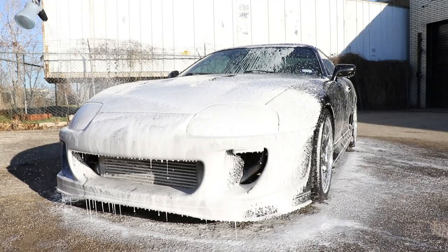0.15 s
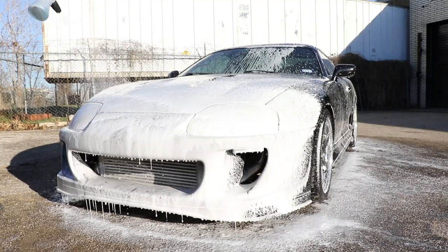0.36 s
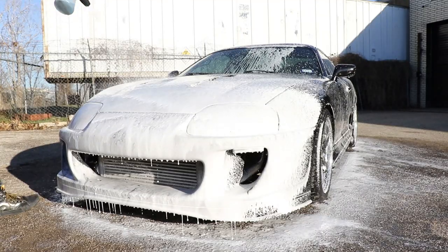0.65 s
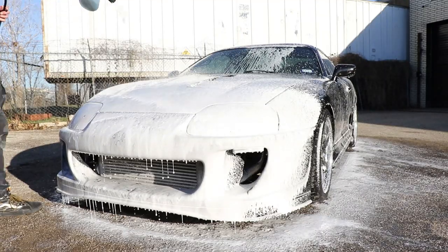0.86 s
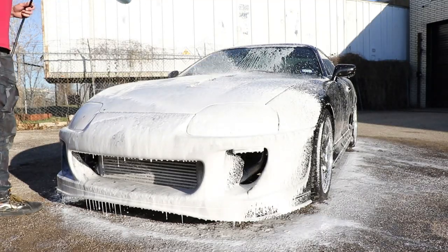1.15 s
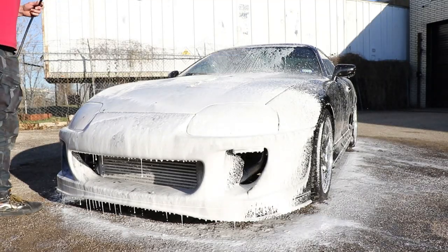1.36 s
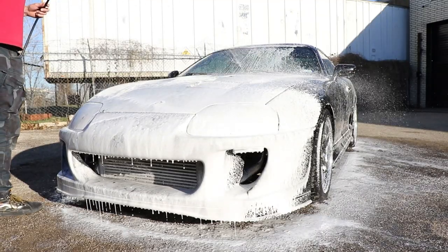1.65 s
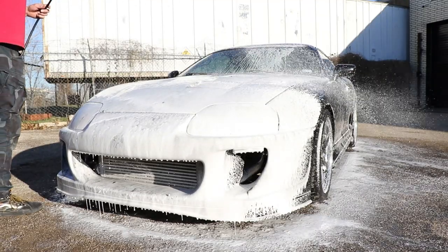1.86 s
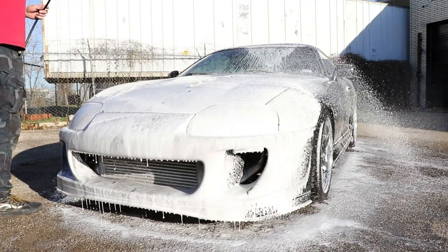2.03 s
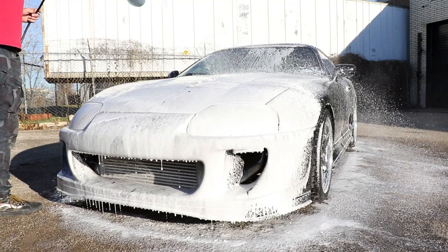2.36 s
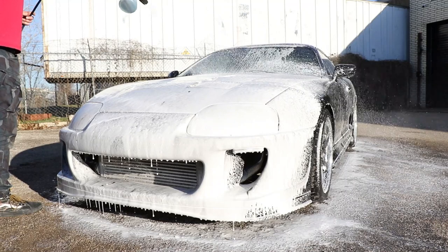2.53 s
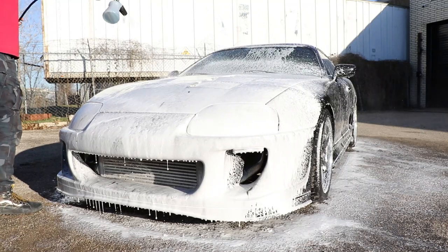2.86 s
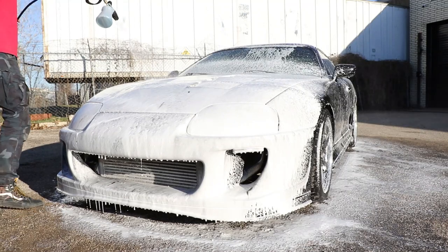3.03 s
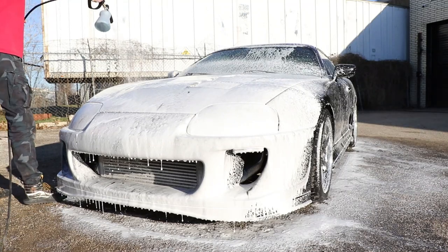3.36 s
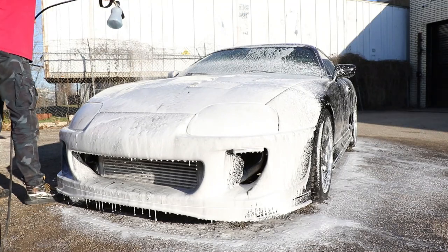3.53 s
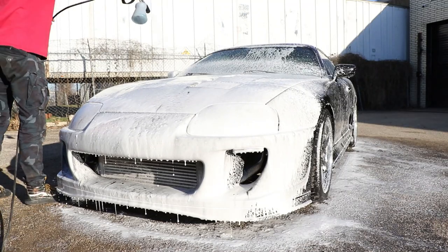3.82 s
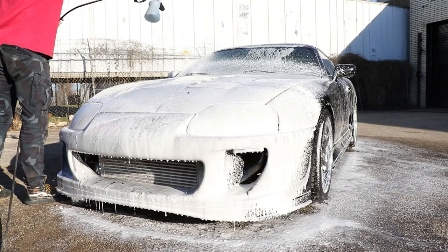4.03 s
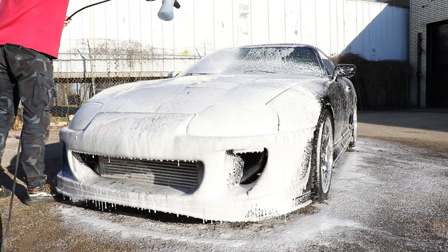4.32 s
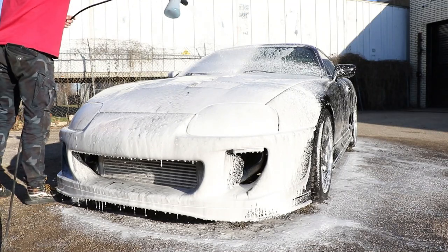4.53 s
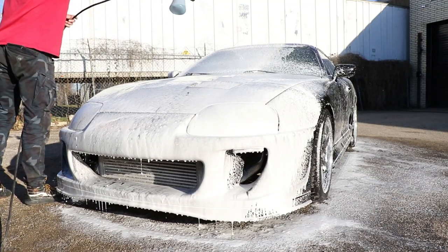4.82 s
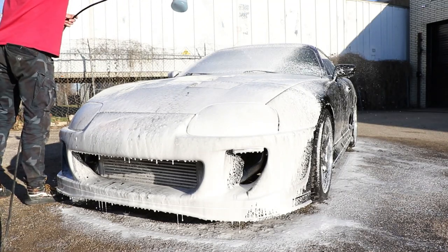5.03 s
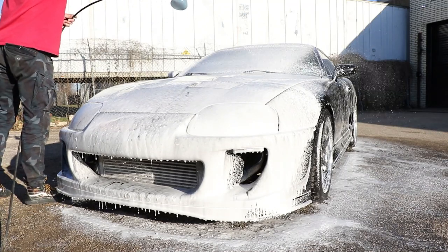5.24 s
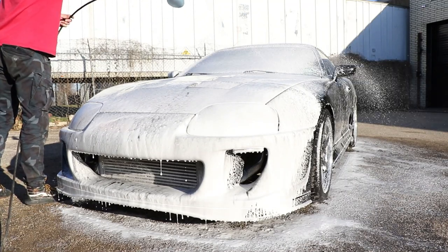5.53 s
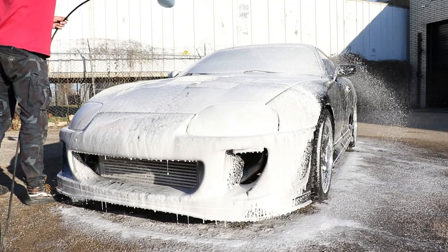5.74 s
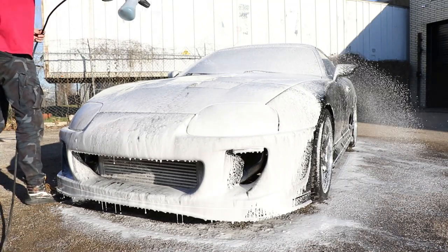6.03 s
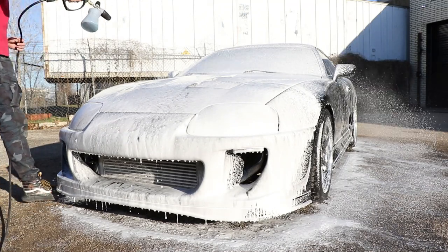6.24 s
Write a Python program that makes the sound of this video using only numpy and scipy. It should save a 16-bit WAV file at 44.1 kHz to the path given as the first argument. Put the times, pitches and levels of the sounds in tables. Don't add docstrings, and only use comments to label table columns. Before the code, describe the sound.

A pressure washer's foam lance hisses broadly and continuously over a car, its tone sliding as it sweeps, with bright spatter and a steady motor whine behind.

```python
import sys
import numpy as np
from scipy import signal
from scipy.fft import rfft, irfft
from scipy.io import wavfile
from scipy.ndimage import uniform_filter1d, map_coordinates

SR = 44100
rng = np.random.default_rng(int(sys.argv[2]) if len(sys.argv) > 2 else 0)


def convert_level_to_amplitude(level_db):
    exponent = np.asarray(level_db, float) / 20
    return 10 ** exponent


def persist_wave(psi):
    counts = np.round(np.clip(psi, -1, 1) * 32767).astype(np.int16)
    wavfile.write(sys.argv[1], SR, np.atleast_2d(counts).T)


N = 281799


def rms_one(x):
    return x / np.sqrt(np.mean(x ** 2) + 1e-20)


def in_time(rows):
    s, *columns = np.transpose(rows)
    return [np.interp(np.arange(N) / SR, s, c) for c in columns]


def swells(rows, edge_s):
    t = np.arange(N) / SR
    shapes = []
    for start_s, length_s, height in rows:
        attack = (t - start_s) / edge_s + 0.5
        release = (start_s + length_s - t) / edge_s + 1
        shapes.append(height * np.clip(np.minimum(attack, release), 0, 1))
    return np.max(shapes, axis=0)


def drift(rate_hz):
    step = 40
    r = np.exp(-2 * np.pi * step * rate_hz / SR)
    slow = signal.lfilter([1], [1, -2 * r, r * r], rng.standard_normal(N // step + 2002))[2000:]
    return np.interp(np.arange(N) / step, np.arange(len(slow)), rms_one(slow))


def coloured(x, spectrum):
    hz, db = np.transpose(spectrum)
    grid_hz = np.maximum(np.fft.rfftfreq(N, 1 / SR), 1)
    gain = convert_level_to_amplitude(np.interp(np.log(grid_hz), np.log(hz), db))
    return rms_one(irfft(rfft(x) * gain, N))


def turbulence(modes, flicker_db, shared_db):
    surge, out = drift(28.0), 0
    for hz, width_hz, level_db in modes:
        r = np.exp(-np.pi * width_hz / SR)
        poles = [1, -2 * r * np.cos(2 * np.pi * hz / SR), r * r]
        band = rng.standard_normal(N)
        for _ in range(2):
            band = signal.lfilter([1, 0, -1], poles, band)
        out = out + rms_one(band) * convert_level_to_amplitude(level_db + flicker_db * drift(9.1) + shared_db * surge)
    return rms_one(out)


# start_s, ground_delay_ms, body_delay_ms
ECHO_DELAYS = [(0.0, 1.89, 0.92), (0.17, 1.905, 0.94), (0.75, 2.14, 1.115), (1.1, 2.3, 1.15),
               (1.66, 2.46, 1.245), (1.85, 2.51, 1.325), (2.0, 2.53, 1.31), (2.11, 2.472, 1.233),
               (2.57, 2.13, 0.785), (3.02, 1.915, 0.55), (3.34, 1.815, 0.455), (3.47, 1.862, 0.44),
               (3.7, 1.94, 0.495), (4.3, 2.04, 0.565), (5.28, 2.22, 0.75), (5.65, 2.295, 0.865),
               (5.89, 2.25, 0.845), (6.39, 1.875, 0.615)]


def echo_delays_ms():
    return in_time(ECHO_DELAYS)


# pitch_hz, width_hz, level_db
LANCE_MODES = [(2700, 2700, -8), (3655, 800, 3.5), (4190, 740, -2.5), (4780, 590, -3), (5374, 680, -0.5),
               (6217, 920, -0.5), (7360, 830, -10.5), (9050, 610, -17), (10400, 1500, -21.5),
               (12500, 2700, -25)]
# start_s, length_s, loss_db
TURN_AWAY = [
    (2.9, 0.89, 2),
    (6.37, .3, 2.5),
]
TURN_S = 0.36


def jet(reach_ms):
    level_db = -21.05 - 0.5 * reach_ms - swells(TURN_AWAY, TURN_S)
    return convert_level_to_amplitude(level_db) * turbulence(LANCE_MODES, flicker_db=1.0, shared_db=0.85)


OPEN_S = 0.071
# pitch_hz, width_hz, level_db
NOZZLE_MODES = [(1832, 240, 6.5), (1977, 240, 5.5)]
# start_s, length_s, rise_db
NOZZLE_FACES = [
    (1.2, 0.22, 1.5),
    (2.2, 0.089, 2),
    (3.6, 0.31, 2),
    (4.06, 0.12, 2),
]


def nozzle_whistle(reach_ms):
    level_db = -26.5 + 3.5 * reach_ms + swells(NOZZLE_FACES, OPEN_S)
    return convert_level_to_amplitude(level_db) * turbulence(NOZZLE_MODES, flicker_db=1.0, shared_db=1.0)


# pitch_hz, width_hz, level_db
BARREL_MODES = [(934, 405, 0.5), (1237, 555, 3.5), (660, 520, -4)]
# start_s, length_s, rise_db
BARREL_OPENS = [
    (0, 0.023, 1.1),
    (2.6, .15, 2),
    (3.5, .25, 3.6),
    (5.2, 0.098, 1.1),
]


def barrel(reach_ms):
    level_db = -27.5 + 1.6 * reach_ms + swells(BARREL_OPENS, OPEN_S)
    return convert_level_to_amplitude(level_db) * turbulence(BARREL_MODES, flicker_db=1.0, shared_db=0.22)


# pitch_hz, width_hz, level_db
CHAMBER_MODES = [(479.7, 147, 2.5), (353, 160, -10.5)]


def chamber_roar(reach_ms):
    return convert_level_to_amplitude(-30.5 - 3 * reach_ms) * turbulence(CHAMBER_MODES, flicker_db=0.2, shared_db=0.4)


def lance():
    reach_ms = echo_delays_ms()[1] - 0.85
    return jet(reach_ms) + nozzle_whistle(reach_ms) + barrel(reach_ms) + chamber_roar(reach_ms)


def droplets(per_s, spectrum):
    sizes = convert_level_to_amplitude(5.3 * np.minimum(rng.exponential(1, N), 4.2)) * rng.choice([-1, 1], N)
    chance = per_s * convert_level_to_amplitude(2.5 * drift(25.0)) / SR
    bursts = sizes * (rng.random(N) < chance)
    mixed = 1.07 * rms_one(bursts) + rng.standard_normal(N)
    return convert_level_to_amplitude(0.87 * drift(30.0)) * coloured(mixed, spectrum)


# start_s, level_db
LANDING = [(0, -37), (.14, -47), (.43, -41.5), (.53, -33.5), (.98, -31.5), (1.42, -33.5), (1.71, -31.5),
           (1.96, -38), (2.68, -36), (2.99, -41), (3.16, -37), (3.35, -43.5), (3.84, -39), (4.09, -33.5),
           (4.43, -31), (4.66, -35), (5.6, -41), (6.39, -40.5)]
# pitch_hz, level_db per Hz
BLOB_SPECTRUM = [(5000, -37), (7500, 4.5), (8500, 4), (10500, 6), (12000, 0), (13500, -16), (16000, -40)]
# pitch_hz, level_db per Hz
MIST_SPECTRUM = [(10000, -37), (12000, 2.5), (13000, 0), (14500, -5), (15700, -9), (17000, -30)]


def spatter():
    level_db, = in_time(LANDING)
    blobs = convert_level_to_amplitude(level_db - 1.6) * droplets(8000, BLOB_SPECTRUM)
    mist_db = level_db - 11.5 - 1.5 * swells(TURN_AWAY[:1], TURN_S)
    return blobs + convert_level_to_amplitude(mist_db) * droplets(9000, MIST_SPECTRUM)


def late(x, delay_ms):
    return map_coordinates(x, [np.arange(N) - delay_ms * SR / 1000], order=2, mode="mirror")


def low_pass(x, cutoff_hz):
    return signal.sosfiltfilt(signal.butter(2, cutoff_hz, fs=SR, output="sos"), x)


# start_s, length_s, share (0-1), start_delay_ms, end_delay_ms
GLINTS = [
    (5.45, 0.44, 0.2, 1.48, 1.36),
    (5.62, 0.44, 0.12, 1.07, 0.96),
    (2.02, 0.35, 0.1, 1.23, 1.48),
    (2.45, 0.29, 0.02, 1.04, 0.81),
]


def glints(dull):
    t, out = np.arange(N) / SR, 0
    for start_s, length_s, share, *delays_ms in GLINTS:
        delay_ms = np.interp(t, [start_s, start_s + length_s], delays_ms)
        out = out + swells([(start_s, length_s, share)], edge_s=0.079) * late(dull, delay_ms)
    return out


def over_foam(dull):
    low = low_pass(dull, 2500)
    treble_share = np.interp(np.arange(N) / SR, [3.1, 3.1 + 0.46], [1, 0.51])
    return low + treble_share * (dull - low)


# start_s, ground_share (0-1), body_share (0-1)
FACING = [(0, 0.4, 0.44), (.8, 0.33, 0.13), (1.3, 0.38, 0.34), (1.6, 0.43, 0.18), (2.0, 0.56, 0.16),
          (2.3, 0.43, 0.09), (2.7, 0.46, 0.22), (3.45, 0.17, 0.12), (3.9, 0.27, 0.12), (4.5, 0.32, 0.16),
          (5.2, 0.44, 0.25), (5.65, 0.46, 0.02), (6.05, 0.52, .26), (6.39, 0.2, 0)]
SCATTER_RATIOS = .36, .78, 1.17


def with_echoes(direct):
    dull = low_pass(direct, 11100)
    ground_ms, body_ms = uniform_filter1d(echo_delays_ms(), size=SR // 12)
    falling = np.maximum(-np.gradient(ground_ms) * SR, 0)
    shares = [*in_time(FACING), 0.053 + 0.1 * falling]
    ground, body, between = np.clip(shares, 0, 0.95)
    heard = direct + glints(dull)
    heard += ground * late(over_foam(dull), ground_ms)
    heard += body * late(dull, body_ms)
    heard += between * late(dull, ground_ms - body_ms)
    for ratio in SCATTER_RATIOS:
        heard += 0.097 * drift(1.0) * late(dull, ratio * ground_ms)
    return heard / np.sqrt(1 + ground ** 2 + body ** 2 + between ** 2)


# start_s, pitch_hz, level_db
PUMP_WHINE = [(0, 573.2, -32), (.25, 573.4, -27.5), (.85, 573.4, -36.5), (1.2, 572, -29.5),
              (2.0, 571.5, -30), (2.9, 573, -29.5), (3.35, 571.5, -27.5), (3.7, 570.4, -22.5),
              (4.2, 570.6, -27.5), (4.8, 570.6, -31), (5.2, 570.6, -27.5), (5.9, 570, -27.5),
              (6.39, 571.7, -30)]
# start_s, level_db
MESH = [(0, -38), (1.2, -38), (1.8, -42), (2.3, -42), (3.0, -43), (3.41, -41), (3.47, -34), (3.57, -29),
        (3.69, -27), (3.74, -41), (3.95, -31), (4.2, -31), (4.45, -37.5), (5.1, -33.5), (6.39, -33)]
# start_s, length_s, rise_db
LOWER_SWELLS = [
    (0, 0.53, 7.4),
    (3.0, 0.32, 10.6),
    (3.55, .3, 9.7),
]
# start_s, length_s, loss_db
UPPER_HIDDEN = [
    (0, 2.4, 4.5),
]
SWELL_S = 0.4
MOTOR_ORDERS = 6, 7.96, 9.96
MESH_ORDERS = 33, 58
FAINT_ORDERS = 6.96, 9, 31.7, 42.95, 45.05
FAINT_DB = -46, -42.5, -47.5, -39.5, -66
WAVER = .25, 1.2, .6, .4, 1.5
# pitch_hz, width_hz, level_db
FAN_MODES = [(2630, 1260, -0.5), (3030, 430, -5.5), (688, 250, -5)]


def motor():
    whine_hz, whine_db = in_time(PUMP_WHINE)
    mesh_db, = in_time(MESH)
    lower_db = -47.5 + swells(LOWER_SWELLS, SWELL_S)
    upper_db = -37 - swells(UPPER_HIDDEN, SWELL_S) + 0.13 * (mesh_db - mesh_db.mean())
    shaft = 2 * np.pi * np.cumsum(whine_hz / MOTOR_ORDERS[0]) / SR
    out = convert_level_to_amplitude(-39.5) * turbulence(FAN_MODES, flicker_db=1.0, shared_db=-0.5)
    orders = [*MOTOR_ORDERS, *MESH_ORDERS]
    levels_db = [whine_db, lower_db, upper_db, mesh_db, mesh_db - 6]
    for order, level_db, waver_rad in zip(orders, levels_db, WAVER):
        out += convert_level_to_amplitude(level_db + 1.63 * drift(15.0)) * np.sin(order * shaft + waver_rad * drift(10.0))
    for order, level_db in zip(FAINT_ORDERS, FAINT_DB):
        out += convert_level_to_amplitude(level_db + 2.9 * drift(0.66)) * np.sin(order * shaft + 0.59 * drift(13.2))
    return np.sqrt(2) * out


# pitch_hz, level_db per Hz
RUMBLE_SPECTRUM = [(12, -54), (20, -33), (43, -16.5), (155, -11.5), (300, -1), (390, -34), (660, -120)]
# start_s, length_s, rise_db
GUSTS = [
    (2.45, 0.34, 5),
    (3.14, 0.045, 13),
    (3.32, 0.061, 17),
    (3.5, 0.61, 7),
    (5.6, .7, 8),
]
# pitch_hz, level_db per Hz
GUST_SPECTRUM = [(30, -45), (100, -11.5), (170, -10.5), (260, -3), (350, -1), (450, -15), (700, -50)]


def yard():
    rumble = convert_level_to_amplitude(-54) * coloured(rng.standard_normal(N), RUMBLE_SPECTRUM)
    gust_db = -56.5 + swells(GUSTS, edge_s=0.096) + 3 * drift(5.2)
    return rumble + convert_level_to_amplitude(gust_db) * coloured(rng.standard_normal(N), GUST_SPECTRUM)


def scene():
    foam = spatter()
    mono = with_echoes(lance() + 0.71 * foam) + 0.63 * foam + motor() + yard()
    return np.stack([mono, mono])


def roll_off(x):
    return signal.sosfilt(signal.butter(12, 15750, fs=SR, output="sos"), x)


def record(dry):
    mix = 1.498 * np.tanh(dry / 1.506)
    return roll_off(mix)


dry = scene()
out = record(dry)
persist_wave(out)
```